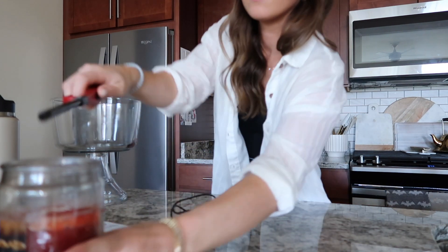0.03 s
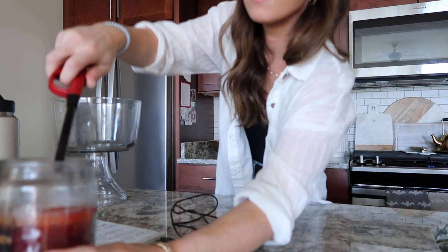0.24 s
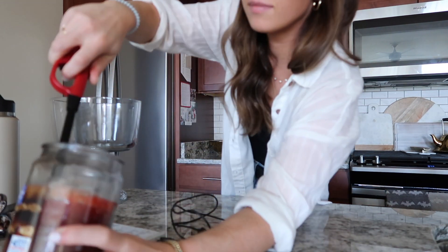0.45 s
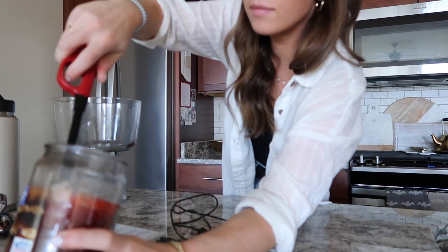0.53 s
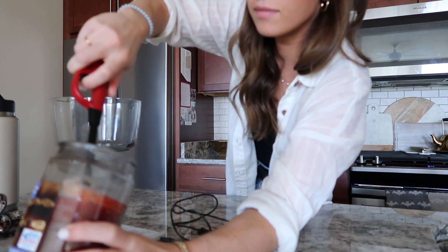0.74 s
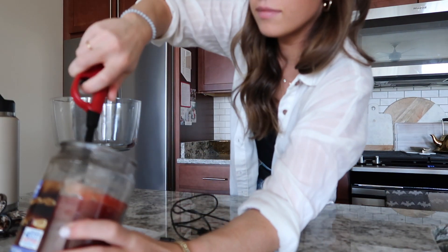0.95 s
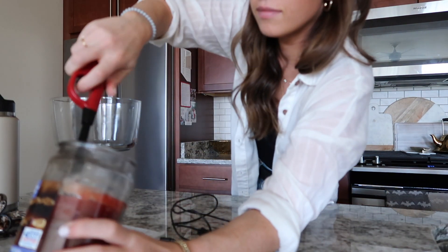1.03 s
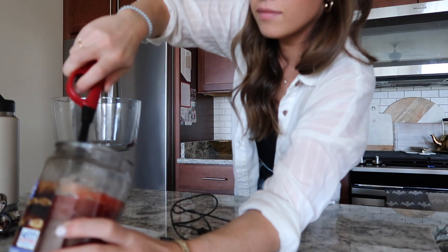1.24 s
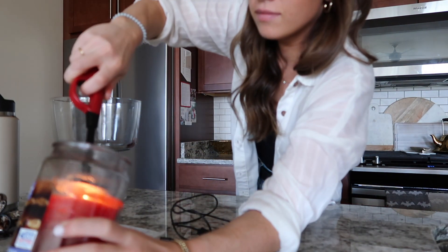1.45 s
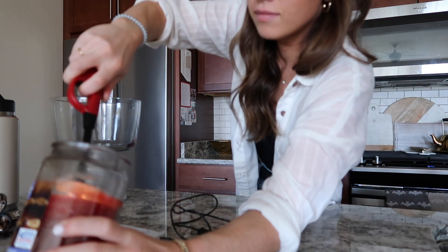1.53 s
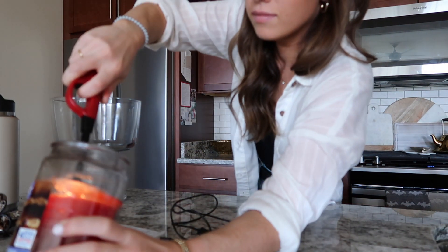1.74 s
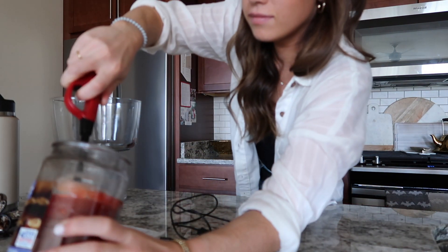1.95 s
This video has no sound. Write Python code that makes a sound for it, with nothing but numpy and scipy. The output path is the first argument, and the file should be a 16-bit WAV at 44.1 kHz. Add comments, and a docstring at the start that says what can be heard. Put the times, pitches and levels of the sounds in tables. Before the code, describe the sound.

Utility lighter trigger snapping sharply near the microphone, with a brief jar scrape in a humming kitchen

```python
"""A utility lighter clicks close to a two-port microphone: damped modes and a noise crack sum at each contact.
A glass jar dragged over a stone counter is sparse grit exciting resonances, with soft low sine knocks.
The hard-walled kitchen answers by convolution with sparse echo tails that decay band by band.
Behind them an appliance hums in narrow tones and a wavering drone, over shaped room noise.
Gain control ducks after loud snaps, and the loudest snaps overload the recorder."""
import sys
import numpy as np
from scipy import signal
from scipy.fft import rfft, irfft
from scipy.io import wavfile
from scipy.ndimage import uniform_filter1d

SR = 44100
rng = np.random.default_rng(int(sys.argv[2]) if len(sys.argv) > 2 else 0)


def output_pcm(signal):
    """Save a mono or channel-first signal as 16-bit PCM at the path in sys.argv[1].

    Samples are clipped to [-1, 1] before scaling.
    """
    pcm = np.clip(np.atleast_2d(signal).T, -1, 1) * 32767
    wavfile.write(sys.argv[1], SR, np.round(pcm).astype(np.int16))


N = 88200  # samples, 2 s

# damped modes of the lighter's plastic body, for the knock: frequency ratio to knock pitch, level/dB, t60/s
KNOCK_MODES = [(.42, -26, .024), (.85, -11, .006), (1, 0, .018), (1.18, -13, .006)]
# damped modes of the same body, for the tick: frequency ratio to tick pitch, level/dB, t60/s
TICK_MODES = [(0.849, -3, 0.0039), (1.001, 0, 0.0035), (1.198, -8.5, 0.0071), (1.33, -13.5, 0.002)]


def gain_of(db):
    """Level to amplitude ratio: 20 dB is a factor of ten."""
    return 10 ** (np.asarray(db) / 20)


def evened(x):
    """Normalisation to an rms amplitude of 1."""
    return x / np.sqrt(np.mean(x ** 2) + 1e-20)


def read(points, hz):
    """Linear interpolation of a spectrum table on a log-frequency axis."""
    f, value = np.transpose(points)
    return np.interp(np.log(hz + 1), np.log(f + 1), value)


def curve(points):
    """Linear interpolation of a time table at every sample."""
    return np.interp(np.arange(N) / SR, *np.transpose(points))


def add(mix, s, sound):
    """Superposition: adds a sound into the mix, starting at s seconds."""
    part = mix[max(round(s * SR), 0):][:len(sound)]
    part += sound[:len(part)]


def resonate(x, hz, width):
    """Resonance of peak gain 1: shift hz down to zero, low-pass with one pole, shift back up."""
    turn = np.exp(2j * np.pi * hz * np.arange(len(x)) / SR)
    pole = np.exp(-np.pi * width / SR)
    return 2 * (turn * signal.lfilter([1 - pole], [1, -pole], x / turn)).real


def click(db, knock_hz, tick_db, tick_hz, crack_db, contact_ms, chance, noise, detune):
    """Impact excitation: modes swell and hold during contact, then decay freely; the crack decays from onset."""
    crack_offset_db, crack_t60_s = -4, .018
    rise_share = 0.21  # of the contact time
    t = np.arange(len(noise)) / SR
    contact = max(contact_ms, .2) / 1000  # s
    after_contact = np.maximum(t - contact, 0)

    out = gain_of(crack_offset_db + crack_db - 60 * t / crack_t60_s) * noise
    modes = [(ratio * knock_hz, mode_db, t60) for ratio, mode_db, t60 in KNOCK_MODES]
    modes += [(ratio * tick_hz, mode_db + tick_db, t60) for ratio, mode_db, t60 in TICK_MODES]
    for (hz, mode_db, t60), (shift, phase) in zip(modes, chance):
        shifted_hz = hz * (1 + detune * (2 * shift - 1))
        envelope = gain_of(mode_db - 60 * after_contact / t60)
        out = out + envelope * np.sin(2 * np.pi * (shifted_hz * t + phase))
    swell = np.sin(np.pi / 2 * np.minimum(t / (rise_share * contact), 1)) ** 2
    return gain_of(db) * swell * out


def lighter(detune):
    """Modal synthesis of all trigger snaps, ticks and rattles, each with its own mode shifts and crack."""
    # contacts: t/s, strength/dB, knock pitch f/Hz, tick level/dB, tick pitch f/Hz, crack level/dB, contact/ms
    contacts = [(0.0364,-26.5,1940,-4.5,3330,-25,0.74), (0.0793,-33.5,1985,-8,3180,-13,4.3),
                (0.0884,-30,1920,-4,3650,-16,0.67), (0.1431,-30.5,1720,13,3470,9,1.12),
                (0.2319,-6,1891,4.5,3660,5,1.88), (0.236,-18,1820,-3,3330,10,1.1),
                (.3046,-15.5,2027,-13,3650,-2.5,2.3), (.5692,-42.5,1820,14,3530,6,1.9),
                (0.5746,-10.5,1870,-7,2885,-4.5,3.06), (0.6134,-25.5,2040,2,3300,-7,1.5),
                (.617,-14,1810,5,3330,2.5,1.92), (.7233,-32.5,1910,-4,3000,-2,4.4),
                (0.914,-47.5,1680,11,3320,-15,3), (1.013,-28,1910,-11.5,3380,-25,2),
                (1.04,-39,1750,3,3135,-14,6.7), (1.053,-27.5,1907,-10.5,3380,-8.5,3.9),
                (1.1303,-37,1860,2,3250,-5,1.7), (1.1799,-38.5,1940,0,3280,1,1.6),
                (1.1905,-36,1960,9.5,3300,6.5,2.5), (1.2381,-15.5,1920,-5,3350,-6,1.17),
                (1.2456,-15.5,1950,-13.5,3330,-10.5,1.4), (1.3993,-24.5,1750,-1,3246,-8,2.2),
                (1.431,-42.5,1880,4,3250,-17,3.4), (1.4626,-27.5,1884,-14.5,2900,-11.5,2.2),
                (1.4948,-8,1753,4,3620,-15.5,0.7), (1.4955,-3.5,2025,3.5,3557,2,1.44),
                (1.9175,-33,1800,-0.5,3310,-31.5,1.66)]
    # relative spectrum of the broad crack: f/Hz, level/dB per Hz
    crack_spectrum = [(100, -55), (600, -24.5), (2000, -12.5), (4300, 6), (7000, -9), (11500, -17),
                      (14000, -14), (16000, -37)]
    out = np.zeros(N)
    colour = gain_of(read(crack_spectrum, np.fft.rfftfreq(2048, 1 / SR)))
    noises = evened(irfft(rfft(rng.standard_normal((64, 2048))) * colour))
    chances = rng.random((64, len(KNOCK_MODES + TICK_MODES), 2))  # mode shift, phase in turns
    for (s, *settings), chance, noise in zip(contacts, chances, noises):
        add(out, s, click(*settings, chance, noise, detune))
    return out


def jar():
    """Friction as random impulses exciting resonances; each soft knock is an enveloped low sine."""
    # jar base dragging on the counter: t/s, level/dB
    drag_level = [(.188, -77), (.198, -37), (.224, -18), (.232, -29.5), (.27, -57), (.30, -30), (.33, -37),
                  (.37, -61), (.385, -62)]
    # resonances of the drag: f/Hz, width of one filter pass/Hz, level/dB
    drag_ring = [(952, 240, -12.5), (1680, 270, -2.5), (2135, 240, 3), (3320, 1600, -9)]
    # jar knocking the counter: t/s, level/dB, f/Hz, length/s
    soft_knocks = [(0.204, -30, 130.4, 0.047), (.255, -33.5, 133, 0.024), (0.313, -28, 116, 0.038)]
    grit_per_s = 4000  # mean impulse rate
    grit = (rng.random(N) < grit_per_s / SR) * rng.standard_normal(N)
    ring = np.zeros(N)
    for hz, width, db in drag_ring:
        ring += gain_of(db) * evened(resonate(resonate(grit, hz, width), hz, width))
    out = gain_of(curve(drag_level)) * evened(ring)
    for s, db, hz, length in soft_knocks:
        t = np.arange(0, length, 1 / SR)
        envelope = np.sin(np.pi * (t / length) ** 0.43)  # rises faster than it falls
        add(out, s, gain_of(db) * envelope * np.sin(2 * np.pi * hz * t))
    return out


def tail():
    """Reverberant impulse response: sparse random-sign echoes in uneven clumps, with a decay rate per band."""
    # kitchen decay: f/Hz, t60/s, relative tone level/dB
    bands = [(288, 0.057, 12), (910, 0.36, 6), (1780, 0.6, -3.5), (2400, 0.47, 2.5), (3700, 0.64, -9),
             (6830, 0.38, 6), (12700, 0.24, 0.5)]
    # left-right likeness of the echoes: f/Hz, likeness (1 = identical)
    echo_likeness = [(300, 1), (2000, 0.97), (4000, 0.58), (8000, 0.014)]
    gap_s = .008  # silence before the first echo
    echo_spread_db, echo_s = 2.5, 0.0036  # strong wall echoes stand out of the tail

    taps, slots = np.zeros((2, SR)), np.arange(0, SR - 1000, 16)
    size = (2, len(slots))
    places = slots + rng.integers(0, 16, size)  # one tap in every 16 samples
    np.put_along_axis(taps, places, rng.choice([-1., 1.], size), 1)
    clumps = evened(uniform_filter1d(rng.standard_normal(SR), max(round(echo_s * SR), 1)))
    hz, t, (a, b) = signal.stft(taps * gain_of(echo_spread_db * clumps), SR, nperseg=128)

    same = np.clip(read(echo_likeness, hz), -1, 1)[:, None]
    z = np.array([a, same * a + np.sqrt(1 - same ** 2) * b])
    tone_db = read([band[::2] for band in bands], hz)[:, None]
    t60 = read([band[:2] for band in bands], hz)[:, None]
    out = signal.istft(z * gain_of(tone_db - 60 * t / t60), SR, nperseg=128)[1]
    return np.pad(out / np.linalg.norm(out[0]), ((0, 0), (round(gap_s * SR), 0)))


def kitchen(faces):
    """Reverberation as convolution: each face of the source feeds the walls through its own echo tail."""
    kitchen_db = -7
    echoes = sum(signal.fftconvolve(face[None], tail(), axes=1)[:, :N] for face in faces)
    return gain_of(kitchen_db) * echoes / np.sqrt(len(faces))


def hum():
    """Narrow-band noise gives the appliance tones; a low sine with slow random level gives the drone."""
    # appliance tones: f/Hz, width of one filter pass/Hz, level/dB
    tone_table = [(230.5, 30, -64), (341.8, 14.5, -59)]
    drone_hz, drone_db, waver_db = 57, -51, 6.5
    tones = np.zeros(N)
    for hz, width, db in tone_table:
        noise = rng.standard_normal(N)
        tones += gain_of(db) * evened(resonate(resonate(noise, hz, width), hz, width))
    waver = evened(uniform_filter1d(uniform_filter1d(rng.standard_normal(N), 3000), 3000))
    drone = np.sin(2 * np.pi * drone_hz * np.arange(N) / SR)
    return np.sqrt(2) * gain_of(drone_db + waver_db * waver) * drone + tones


def air():
    """Partly coherent noise: the room noise is alike at both ports in the bass."""
    # relative spectrum of the room noise: f/Hz, level/dB per Hz
    air_spectrum = [(25, -41.5), (75, -1.5), (335, -4), (420, -10), (850, -14.5), (1900, -21), (2600, -16),
                    (4000, -23.5), (7000, -30), (12000, -40), (15000, -67)]
    # left-right likeness of the room noise: f/Hz, likeness (1 = identical, negative = opposed)
    air_likeness = [(60, 1), (240, 0.79), (950, 0.45), (3000, 0.97), (9000, -0.53)]
    air_db = -47.5  # rms over both ports
    frames, hz = N // 512 + 5, np.fft.rfftfreq(2048, 1 / SR)
    a, b, c, d = rng.standard_normal((frames, 1025, 4)).T
    same = np.clip(read(air_likeness, hz), -1, 1)[:, None]
    left, other = a + 1j * b, c + 1j * d
    right = same * left + np.sqrt(1 - same ** 2) * other
    z = np.array([left, right]) * gain_of(read(air_spectrum, hz)[:, None])
    noise = signal.istft(z, nperseg=2048, noverlap=1536)[1][:, 1024:N + 1024]
    return gain_of(air_db) * evened(noise)


def scene():
    """Superposition of direct sound, with level and phase differences between ports, echoes and background."""
    # direct sound at the two ports: f/Hz, left louder by/dB, left leads by/rad
    ports = [(125, 0, 0.013), (1000, 1.5, 0.084), (2860, 2.1, 0.1), (4500, 2, 1.5), (7430, 0, 1.22),
             (13250, 0, 2.65)]
    grip_detune = .015  # largest relative shift; grip shifts the modes from click to click
    face_detune = .11  # other faces of the body ring at other pitches toward the walls
    drag, hz = jar(), np.fft.rfftfreq(N, 1 / SR)
    level_db = read([port[:2] for port in ports], hz)
    lead = read([port[::2] for port in ports], hz)
    half = gain_of(level_db / 2) * np.exp(.5j * lead)  # each port takes half the difference
    direct = irfft(rfft(lighter(grip_detune) + drag) * np.array([half, 1 / half]), N)
    faces = [lighter(face_detune) + drag for _ in range(4)]
    return direct + kitchen(faces) + air() + hum()


def record(dry):
    """Recorder dynamics: delayed gain reduction with slow recovery, saturation with a firm knee, band limit."""
    duck_from_db, duck_share = -12.5, 0.32  # threshold; dB of reduction per dB above it
    duck_lag_s, recover_db_per_s = 0.0045, 1.5
    ceiling, edge_hz = 1.0, 16290
    power_db = 10 * np.log10(abs(uniform_filter1d((dry ** 2).mean(0), 200)) + 1e-12)
    fall = np.arange(N) * recover_db_per_s / SR
    lag = round(duck_lag_s * SR)
    # running maximum on a falling ramp: jumps up at once, recovers at a steady rate
    held_db = np.maximum.accumulate(duck_share * (power_db - duck_from_db) + fall) - fall
    over_db = np.maximum(held_db, 0)
    ducked = dry / gain_of(uniform_filter1d(np.pad(over_db, (lag, 0))[:N], 100))
    saturated = ducked / (1 + abs(ducked / ceiling) ** 4) ** (1 / 4)
    low_pass = signal.firwin(511, edge_hz, window=("kaiser", 9), fs=SR)
    return signal.oaconvolve(saturated, low_pass[None], "same")


dry = scene()
out = record(dry)
output_pcm(out)
```